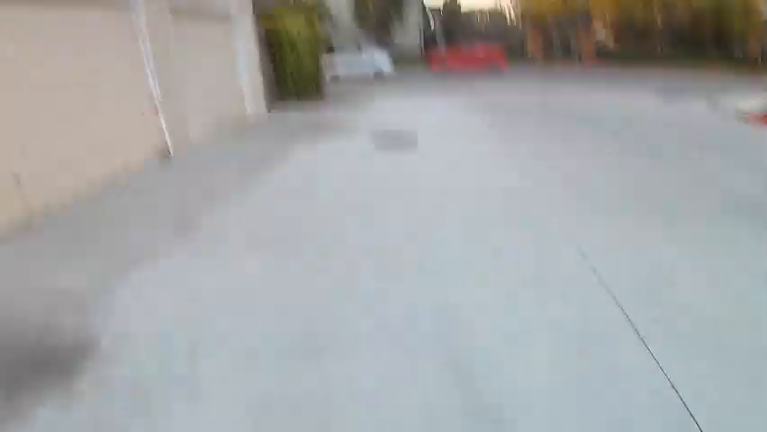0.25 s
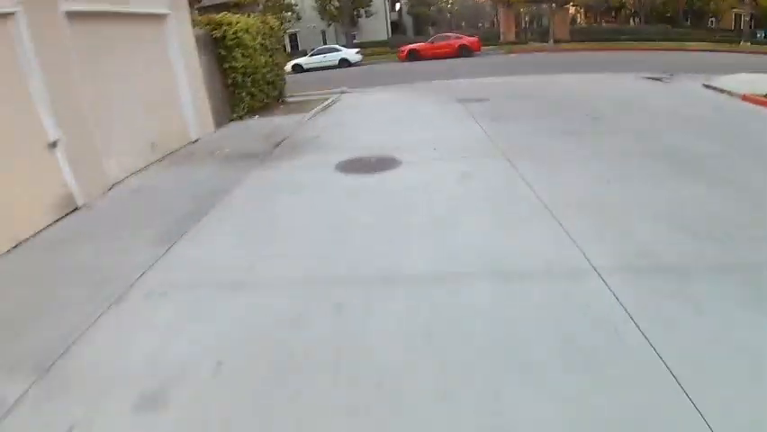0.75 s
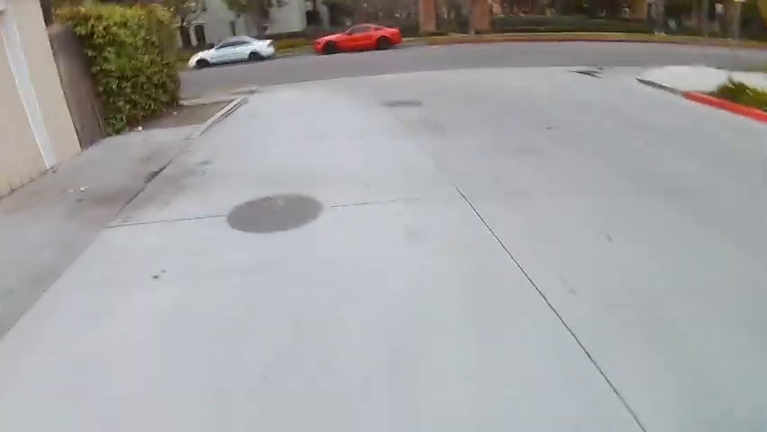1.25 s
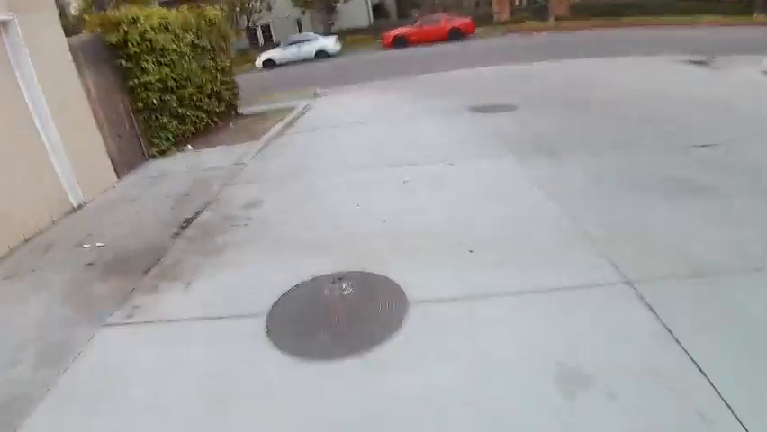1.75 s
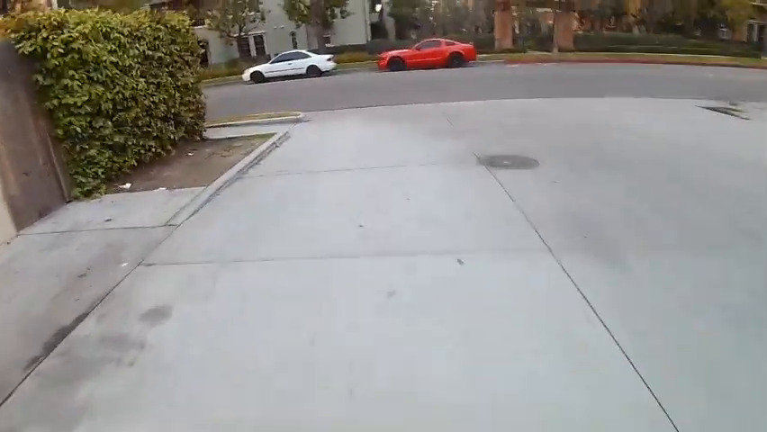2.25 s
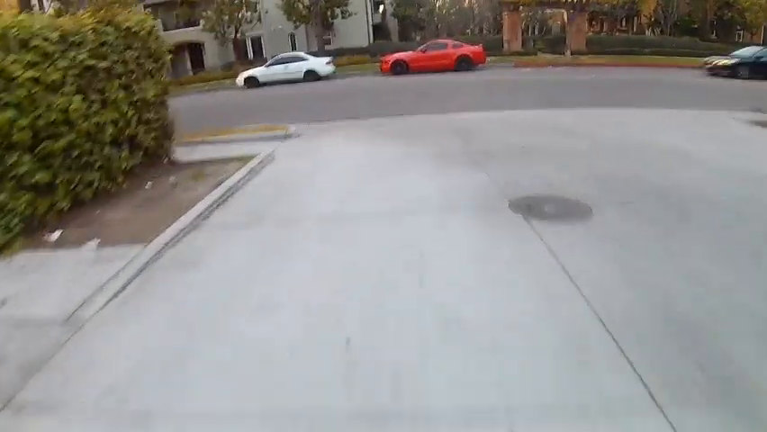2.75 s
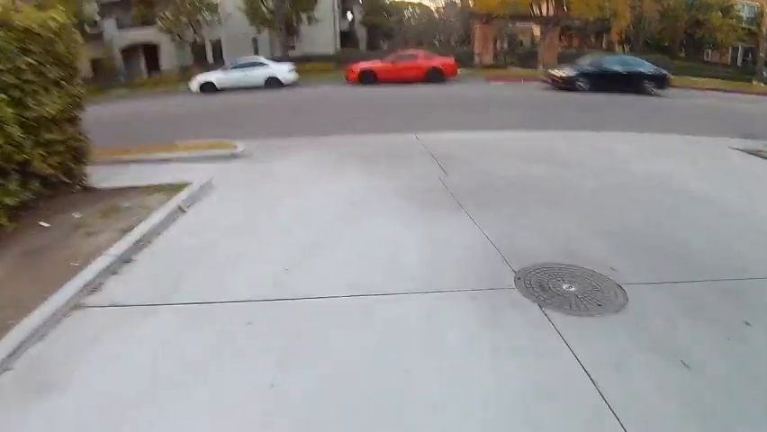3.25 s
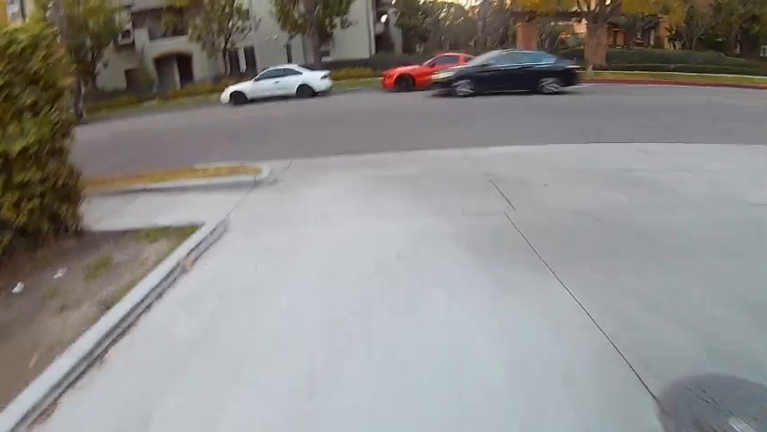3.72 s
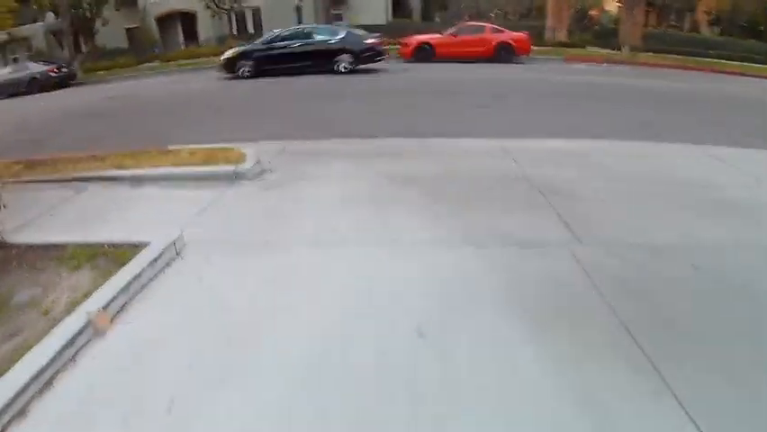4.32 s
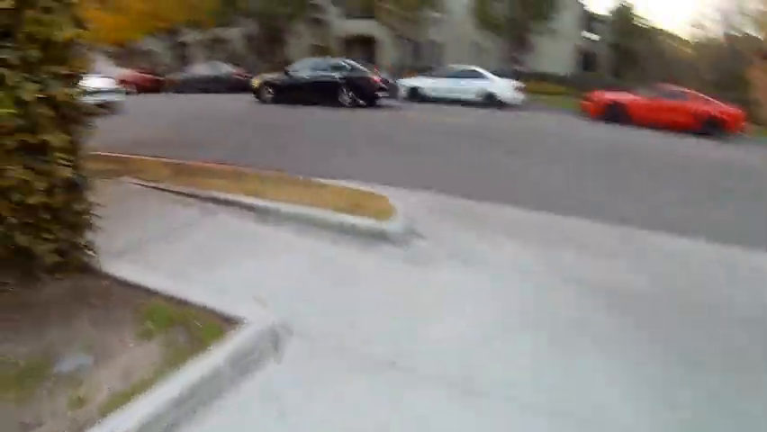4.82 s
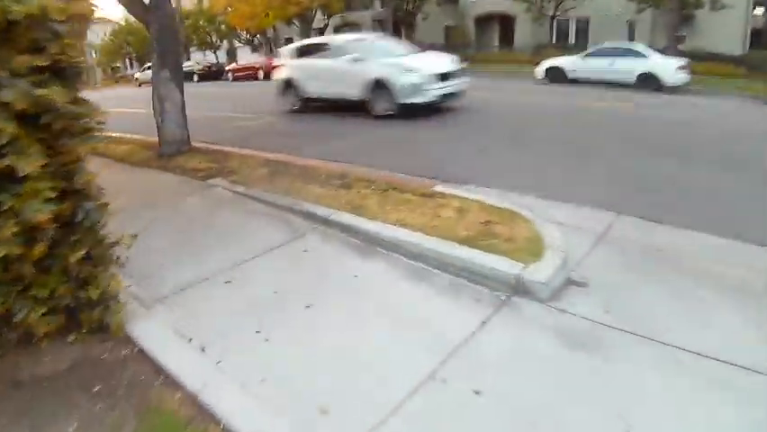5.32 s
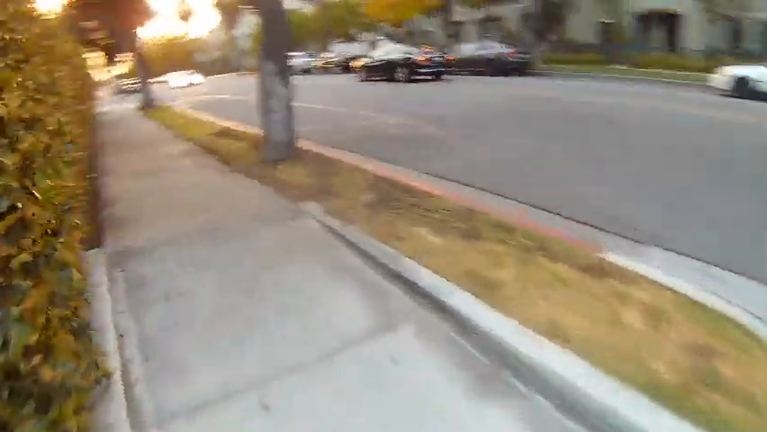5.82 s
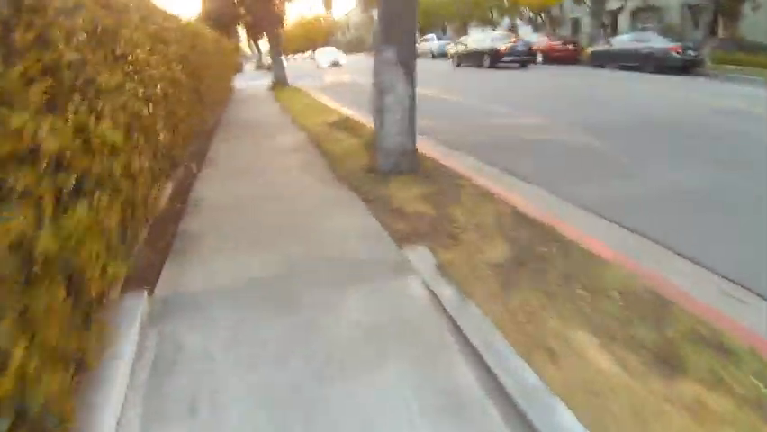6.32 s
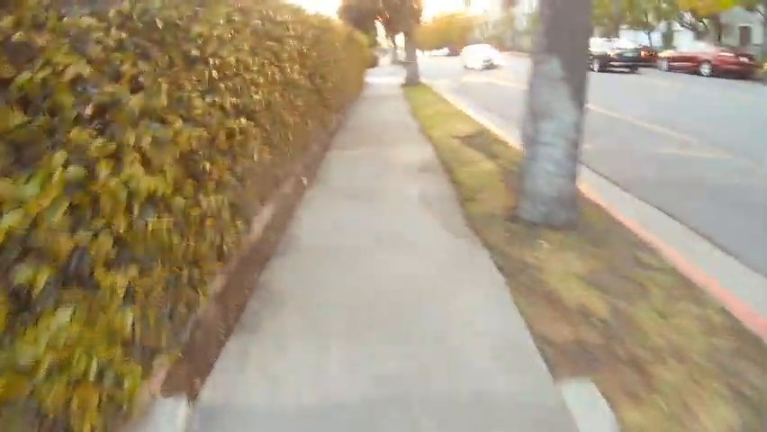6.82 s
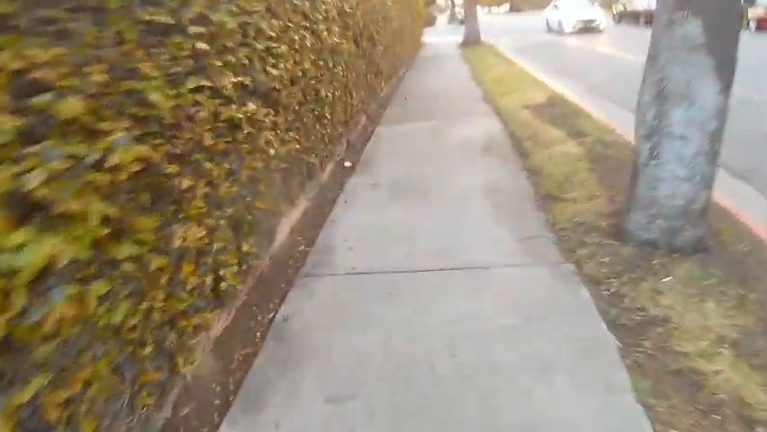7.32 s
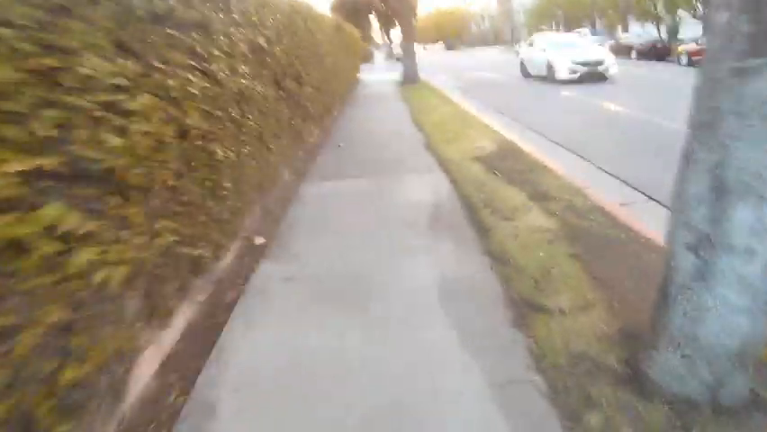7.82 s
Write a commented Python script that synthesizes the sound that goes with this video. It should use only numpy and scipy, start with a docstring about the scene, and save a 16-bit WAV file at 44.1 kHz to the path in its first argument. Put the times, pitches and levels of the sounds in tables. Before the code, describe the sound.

A skateboard rolls over concrete throughout, a gritty, hollow midrange rumble, close and somewhat muffled as though heard through a closed housing. Wheels clack irregularly on joints and stones, often in quick pairs, ringing the deck and trucks. Stronger knocks land around 0.2, 0.8, 1.6, 2.5, 3.0, 3.3 and 4.3 seconds. Faint scuffs and brief low deck groans sit underneath. From about 5 seconds, cars pass softly over a low street rumble, with tyre wash, two faint high whirrs and a short engine hum around 6.5 seconds. More sharp clacks come at 5.7, 6.7 and 6.9 seconds. The rolling eases just after 7 seconds, then at 7.5 the wheels grind loudly over a rough patch and hop with a knock. A second, weaker grind follows with short groans and knocks, and the board is still rolling at 8 seconds.

```python
"""A skateboard rolls over concrete slabs, heard through a closed housing. From the start, grit shakes the
wheels and joints knock front then rear axle; both ring deck and trucks. Stones strike, the deck groans under
load, brief scuffs rasp and faint treble flickers. Street rumble and tyre wash run throughout, the wash loudest
at the start; from about 5 s two whirrs and one engine note pass. At 7.5 s each axle in turn grinds over a rough
patch and hops."""
import sys
import numpy as np
from scipy import signal
from scipy.fft import rfft, irfft
from scipy.io import wavfile
from scipy.ndimage import uniform_filter1d

SR = 44100
rng = np.random.default_rng(int(sys.argv[2]) if len(sys.argv) > 2 else 0)


def int16_out(signal):
    """Quantize to a 16-bit WAV file."""
    q = np.round(np.clip(np.atleast_2d(signal).T, -1, 1) * 32767)
    wavfile.write(sys.argv[1], SR, q.astype(np.int16))


N = 355887

# Ground under the wheels. Each row: time in seconds, rolling level, hardness and weight in dB.
GROUND = [(0.0, -35, 5, 10.5), (0.35, -29.5, -4.5, 10), (0.9, -29, 11.5, 6), (1.5, -30.5, -8, -0.5),
          (2.2, -27.5, -6, -6), (3.0, -29.5, 9, 10), (3.4, -28.5, -1, -7.5), (4.4, -31.5, -7, 2),
          (5.15, -32, 9, 8.5), (5.55, -28, 11.5, 3), (6.0, -33.5, 16.5, 3.5), (6.7, -28, 6, 2),
          (7.03, -43.5, 18, 14), (7.28, -45.5, 19.5, 12), (7.4, -30, 0, 12.5), (7.5, -29, 12.5, 5.5),
          (8.07, -36.5, 16, 11)]
# Deck and truck modes. Each row: frequency in Hz, width in Hz, relative gain in dB.
BOARD_MODES = [(136, 170, -15), (250.4, 110, 1), (344, 210, -2), (480.4, 80.5, 11), (584.5, 92, 6.5),
               (880, 340, -26), (941, 140, -2.5), (1042, 100, -9), (1556, 250, -13.5), (2030, 660, -5),
               (2190, 420, -16), (2740, 260, -33.5)]
# An axle on the rough patch. Each row: start and end in seconds, level in dB, build-up in seconds,
# hardness and weight in dB.
GRINDS = [(7.525, 7.679, -14.5, 0.092, 13, -31), (7.746, 7.968, -29.5, 0.012, 10.5, 6)]
# An axle crossing a joint at a slant. Each row: time in seconds, first wheel in dB, second wheel's lag
# in seconds, second wheel in dB, hardness, weight and truck ring in dB, chatter in seconds.
JOINTS = [(0.168, -5.5, 0.01, -8.5, 10, -12, 5.5, 0.0099), (0.309, -10, .010, -11.5, 6, -2, 7.5, 0.007),
          (0.331, -12, .009, -14, 2, -10, -0.5, 0.0086), (0.791, -2.5, .010, -8, 1.5, -25, 4, 0.013),
          (1.589, -11.5, .006, -2.5, 6, -29, 3.5, 0.0085),
          (1.866, -21.5, 0.027, -21.5, 12, -21, -3.5, 0.019), (2.482, -8.5, 0.014, -8, 6.5, -5, -1, 0.015),
          (2.65, -9, .019, -23, -17, 26.5, -8, 0.007), (2.829, -19.5, 0.02, -25, 10.5, 5, -2, 0.013),
          (2.925, -21, .022, -21, -22, -2, 0, 0.025), (3.046, -8.5, 0.013, -11, 1.5, -2, 4, 0.0094),
          (3.086, -17.5, 0.0098, -18.5, 4.5, -5, 1, 0.0086), (3.343, -6.5, .009, -10.5, 1, -19, 0, 0.0067),
          (3.364, -13.5, 0.02, -8, 5.5, -16, -7, 0.0069), (4.338, -8.5, .007, -7, -8.5, -28, 13, 0.0057),
          (4.526, -11.5, 0.0071, -17, 4.5, 10, -15, 0.015), (5.697, -7, 0.0098, -15, 2.5, -5, 13, 0.0054),
          (5.974, -10.5, .008, -15.5, -5, -11, 11.5, 0.0073), (6.657, -1.5, 0.013, -19, 4, -42, 10, 0.0081),
          (7.681, -5, .011, -11.5, -5, -4, 9, 0.007)]
# One wheel on a crack or stone. Each row: time in seconds, blow level, hardness and weight in dB.
STONES = [(0.282, -20, 5, 1), (0.436, -22.5, 3, -8), (0.476, -39, 10, -10), (0.629, -31, 19, -6),
          (0.658, -36, 27, -8), (0.927, -7, 4, -3), (1.18, -36, 9, 6), (1.404, -22.5, -12, -6),
          (1.525, -16.5, -15, -15), (1.642, -19.5, 0, -7), (1.739, -10.5, -6, 4), (2.154, -19, -1, 13),
          (2.343, -14, -12, -1), (2.461, -17, 13, 7), (3.025, -19.5, 12, 12), (3.189, -20.5, 5, 4),
          (3.536, -14, 2.5, 13), (3.652, -20.5, -5, 31), (4.265, -15.5, 7, 8), (4.358, -26, 13, -1),
          (4.849, -25, 9, 2), (5.597, -21.5, 15, -20), (5.637, -19, 5, -15), (5.788, -16, -11, 33),
          (5.851, -12.5, 10, 11), (6.01, -13.5, -17, -2), (6.137, -16.5, -20, 16), (6.175, -19.5, -11, 29),
          (6.745, -20.5, 11.5, 5), (6.858, -7, 6.5, 7), (7.389, -27.5, 10, -1), (7.694, -26, 10, -4),
          (7.952, -15.5, 4, 25), (7.961, -12.5, 13.5, 16)]
# Deck groans. Each row: start and end in seconds, first and last pitch in Hz, level in dB.
GROANS = [(0.587, 0.896, 120, 133, -41), (3.598, 3.753, 120, 129, -40.5), (7.584, 7.656, 250, 220, -25),
          (7.74, 7.833, 165, 184, -28.5), (7.773, 7.878, 272, 229, -25.5)]
# Scuffs. Each row: start and length in seconds, level in dB.
SCUFFS = [(0.425, .03, -68), (0.465, 0.024, -58), (0.726, 0.051, -59), (0.888, 0.036, -56),
          (1.17, 0.032, -62), (1.868, 0.17, -67), (2.662, 0.036, -58), (2.816, 0.054, -59),
          (2.923, .09, -64.5), (3.363, .03, -53), (3.623, 0.057, -66), (3.877, 0.027, -64),
          (4.84, 0.039, -65), (7.085, 0.091, -56)]
# Whirrs of passing cars. Each row: start and end in seconds, level in dB, centre and width in Hz.
WHIRRS = [(4.9, 5.75, -67, 3730, 794), (6.21, 6.68, -63.5, 3870, 350)]

# Level curves. Each row: time in seconds, level in dB.
TYRE_LEVEL = [(0, -32), (2, -47), (4.5, -41.5), (5.1, -39), (5.5, -33.5), (6.0, -37), (6.6, -36),
              (7.0, -43.5), (8.07, -36)]
RUMBLE_LEVEL = [(0, -53), (2.2, -54), (4.7, -48), (7.3, -44), (8.07, -47)]  # swells as the board nears the road
FLICKER_LEVEL = [(0.0, -71.5), (0.9, -71), (1.4, -74.5), (2.3, -86), (2.9, -79), (3.4, -79.5), (4.6, -78),
                 (6.0, -68.5), (6.9, -76), (7.4, -68.5), (7.75, -62), (8.07, -66.5)]

# Noise spectra. Each row: frequency in Hz, relative density in dB.
SCUFF_SPECTRUM = [(1530, -45), (2600, -15), (3580, -2), (4310, -12), (5960, -12), (7500, -33), (9750, -63),
                  (16500, -120)]
TYRE_SPECTRUM = [(300, 19), (900, 5), (1500, 2), (2300, -23.5), (2800, -35), (3400, -32.5), (3800, -30),
                 (4300, -36.5)]
RUMBLE_SPECTRUM = [(20, -34.5), (30, -16), (40, -8), (50, -10), (80, -19.5), (110, -14), (200, -22.5)]
FLICKER_SPECTRUM = [(2800, -13), (3300, -3), (3800, 5.5), (4300, -8.5), (5200, -2.5), (6000, -16.5),
                    (7000, -20)]
HISS_SPECTRUM = [(2500, -25), (3300, -4.5), (3900, -5), (5700, -12), (7500, -19), (8500, -15.5),
                 (13000, -18), (16000, -23.5)]


def rolling():
    """Grit rings the board; hard ground drives the upper modes, the rider's weight the lower."""
    hop_s, hop_db = 0.083, -7.5
    force = soft_wheel(grit(per_s=4000, spread_db=2.2, lumps_db=1.2))
    hz, _, mode_db = np.transpose(BOARD_MODES)
    modes = gain_of(mode_db)[:, None] * np.array([ring(force, f, width) for f, width, _ in BOARD_MODES])
    modes /= np.sqrt(np.mean(modes.sum(axis=0) ** 2))
    hard, heavy = mode_shares(hz)
    level_db, hard_db, weight_db = follow(GROUND)
    for _, end, *_ in GRINDS:  # the wheels hop after each grind: the rolling dips
        level_db = level_db + hop_db * swell((end, end + hop_s), hop_s / 2, hop_s / 2)
    tilt = gain_of(np.outer(hard, hard_db) + np.outer(heavy, weight_db))
    out = gain_of(level_db) * (tilt * modes).sum(axis=0)
    for start, end, db, build_s, grind_hard_db, grind_weight_db in GRINDS:
        mode_gains = gain_of(db + hard * grind_hard_db + heavy * grind_weight_db)
        out += swell((start, end), build_s, fall_s=0.014) * (mode_gains @ modes)
    return out


def grit(per_s, spread_db, lumps_db):
    """Many small stones, a few large, in lumps of about a wheel's contact time."""
    sizes = gain_of(spread_db * np.minimum(rng.exponential(1, N), 4))
    signs = rng.choice([-1., 1.], N)
    lumps = unit_rms(smooth(rng.standard_normal(N), samples=300))
    hits = rng.random(N) < per_s / SR
    return unit_rms(sizes * signs * hits * gain_of(lumps_db * lumps))


def soft_wheel(force, cutoff_hz=1450):
    """The rubbery wheel rounds off every push."""
    return signal.sosfilt(signal.butter(5, cutoff_hz, fs=SR, output="sos"), force)


def mode_shares(hz):
    """Share of hardness for modes above the deck's main ring, and of weight for those below."""
    return np.clip(np.log2(hz / 600), 0, 1.2), np.clip(np.log2(450 / hz), 0, 1)


def knocks():
    """Each blow is one sharp push, then the wheel chatters briefly on the edge."""
    truck_hz, truck_octaves = 950, 0.33  # where the metal trucks ring
    edge_hard_db, edge_weight_db = 2.0, -2.5  # an edge is harder than grit and moves low modes less
    length, bounces_per_s = 4000, 1500
    t, out = np.arange(length) / SR, np.zeros(N + length)
    responses = np.array([ring(soft_wheel(t == 0), hz, 1.02 * width) for hz, width, _ in BOARD_MODES])
    hz, _, mode_db = np.transpose(BOARD_MODES)
    hard, heavy = mode_shares(hz)
    truck = np.exp(-(np.log2(hz / truck_hz) / truck_octaves) ** 2)
    for s, blow_db, hard_db, weight_db, truck_db, chatter_s in wheel_strikes():
        bounces = rng.standard_normal(length) * (rng.random(length) < bounces_per_s / SR)
        force = 0.51 * bounces * np.exp(-(t / chatter_s) ** 2)
        force[0] = 1
        tilt_db = hard * (hard_db + edge_hard_db) + heavy * (weight_db + edge_weight_db)
        body = gain_of(mode_db + tilt_db + truck * truck_db) @ responses
        blow = signal.fftconvolve(force, body)[:length]
        peak_rms = np.sqrt(np.max(uniform_filter1d(blow ** 2, size=150)))
        out[round(s * SR):][:length] += gain_of(blow_db) * blow / peak_rms
    return out[:N]


def wheel_strikes(pebbles_per_s=3.0, pebble_db=-29.5, stone_chatter_s=0.0083):
    """Both wheels at each joint, then stones and random stray pebbles."""
    first = [(s, db, *rest) for s, db, _, _, *rest in JOINTS]
    second = [(s + lag_s, db, *rest) for s, _, lag_s, db, *rest in JOINTS]
    times_s = np.cumsum(-np.log(1 - rng.random(80)) / pebbles_per_s)
    size_db, hard_db, weight_db = (rng.standard_normal((80, 3)) * [1.5, 5.0, 4.3]).T
    pebbles = np.transpose([times_s, pebble_db + size_db, hard_db, weight_db])[times_s < N / SR]
    return first + second + [(*row, 0, stone_chatter_s) for row in [*STONES, *pebbles]]


def groans(fade_share=0.34):
    """Short low notes from the flexing deck."""
    return sum(note((start, end), glide_hz, db, fade_share * (end - start))
               for start, end, *glide_hz, db in GROANS)


def scuffs(fade_s=0.012):
    """Brief bright rasps."""
    rasp = patchy_noise(SCUFF_SPECTRUM, patch_db=3.0, patch_bins=6)
    return rasp * sum(gain_of(db) * swell((s, s + dur_s), fade_s, fade_s) for s, dur_s, db in SCUFFS)


def traffic():
    """The street: tyre wash, rumble, whirrs and one passing engine."""
    wash = gain_of(follow(TYRE_LEVEL)[0]) * patchy_noise(TYRE_SPECTRUM, patch_db=2.0, patch_bins=10)
    engine = note(span_s=(6.24, 6.78), glide_hz=(75, 77), db=-44, fade_s=0.057)
    return wash + rumble() + whirrs() + engine


def rumble():
    """Distant engines: low noise with a narrow hump."""
    colour = gain_of(spectrum_db(RUMBLE_SPECTRUM, np.fft.rfftfreq(N, 1 / SR)))
    low_noise = irfft(rfft(rng.standard_normal(N)) * colour, N)
    return gain_of(follow(RUMBLE_LEVEL)[0]) * unit_rms(low_noise)


def whirrs(fade_share=0.37):
    """One noise band swells as each car goes by."""
    white, out = rng.standard_normal(N), np.zeros(N)
    for start, end, db, hz, width_hz in WHIRRS:
        fade_s = fade_share * (end - start)
        band = unit_rms(ring(ring(white, hz, width_hz), hz, width_hz))
        out += gain_of(db) * swell((start, end), fade_s, fade_s) * band
    return out


def flicker():
    """Thin patches of treble come and go."""
    patches = patchy_noise(FLICKER_SPECTRUM, patch_db=3.5, patch_bins=12)
    return gain_of(follow(FLICKER_LEVEL)[0]) * patches


def ring(force, hz, width_hz):
    """One mode rung by a force; its rms follows that of white drive."""
    r = np.exp(-np.pi * width_hz / SR)
    mode = signal.lfilter([1, 0, -1], [1, -2 * r * np.cos(2 * np.pi * hz / SR), r * r], force)
    return mode * np.sqrt((1 - r * r) / 2)


def note(span_s, glide_hz, db, fade_s):
    """Gliding sine, faded in and out."""
    hz = np.interp(np.arange(N) / SR, span_s, glide_hz)
    tone = np.sqrt(2) * np.sin(2 * np.pi * np.cumsum(hz) / SR)
    return gain_of(db) * swell(span_s, fade_s, fade_s) * tone


def patchy_noise(spectrum, patch_db, patch_bins):
    """Coloured noise with random patches in frequency and time; rms 1."""
    frames, hz = N // 256 + 5, np.fft.rfftfreq(1024, 1 / SR)
    real, imag, patches = rng.standard_normal((frames, 513, 3)).T
    patches = uniform_filter1d(patches, size=patch_bins, axis=0)
    patches = unit_rms(uniform_filter1d(patches, size=8, axis=1))
    bins = (real + 1j * imag) * gain_of(spectrum_db(spectrum, hz)[:, None] + patch_db * patches)
    return unit_rms(signal.istft(bins, nperseg=1024, noverlap=768)[1][:N])


def spectrum_db(spectrum, hz):
    """Spectrum interpolated over log frequency."""
    points_hz, db = np.transpose(spectrum)
    return np.interp(np.log(hz + 1), np.log(points_hz + 1), db, left=-90, right=-90)


def follow(rows):
    """Each column of a curve at every sample."""
    times_s, *columns = np.transpose(rows)
    return [np.interp(np.arange(N) / SR, times_s, column) for column in columns]


def swell(span_s, rise_s, fall_s):
    """Linear rise, hold and fall within the span."""
    t = np.arange(N) / SR
    return np.clip(np.minimum((t - span_s[0]) / rise_s, (span_s[1] - t) / fall_s), 0, 1)


def smooth(x, samples):
    return uniform_filter1d(uniform_filter1d(x, samples), samples)


def gain_of(db):
    return 10 ** (np.asarray(db) / 20)


def unit_rms(x):
    return x / np.sqrt(np.mean(x ** 2) + 1e-20)


def scene():
    """Board and street, mono."""
    low_cut_hz = 75  # the housing passes little of the board's deepest thump
    housing = signal.butter(2, low_cut_hz, "high", fs=SR, output="sos")
    board = signal.sosfilt(housing, rolling() + knocks())
    return (board + groans() + flicker() + scuffs() + traffic())[None]


def record(dry):
    """Faint hiss follows the loudness; the loudest blows clip softly; the top treble is cut."""
    hiss_floor_db, cutoff_hz = -85, 15780
    loudness = np.sqrt(abs(smooth(dry ** 2, samples=900)) + 1e-12)
    hiss_gain = gain_of(-35.5) * loudness ** 1.38 + gain_of(hiss_floor_db)
    mix = dry + hiss_gain * patchy_noise(HISS_SPECTRUM, patch_db=4.5, patch_bins=3)
    clipped = mix / (1 + abs(mix) ** 6) ** (1 / 6)
    lowpass = signal.firwin(511, cutoff_hz, window=("kaiser", 9), fs=SR)
    return signal.oaconvolve(clipped, lowpass[None], "same")


dry = scene()
out = record(dry)
int16_out(out)
```